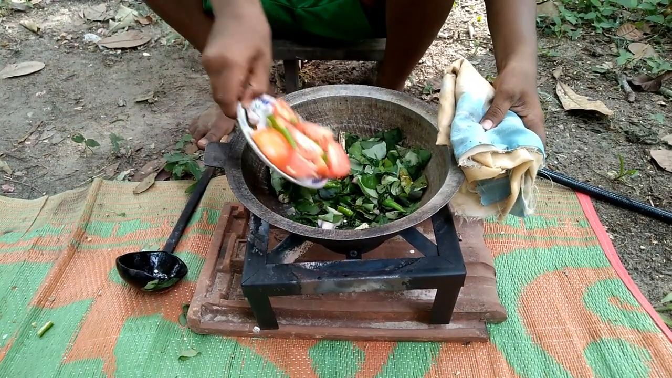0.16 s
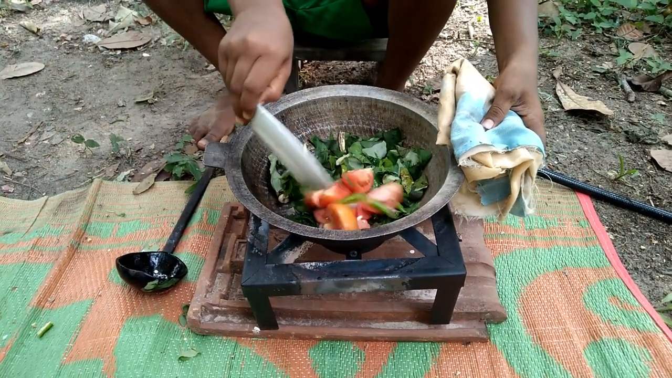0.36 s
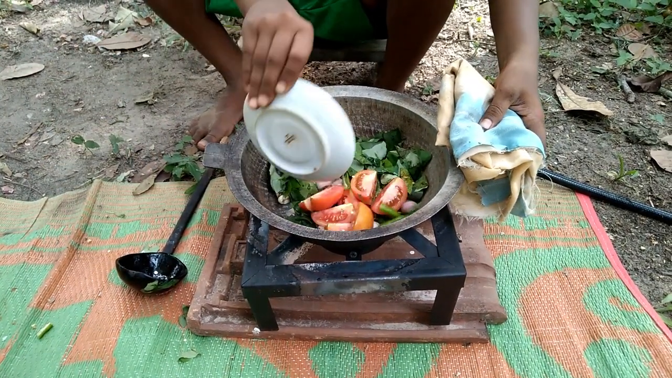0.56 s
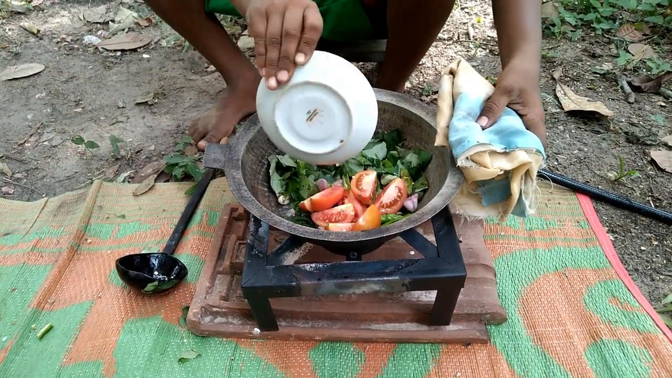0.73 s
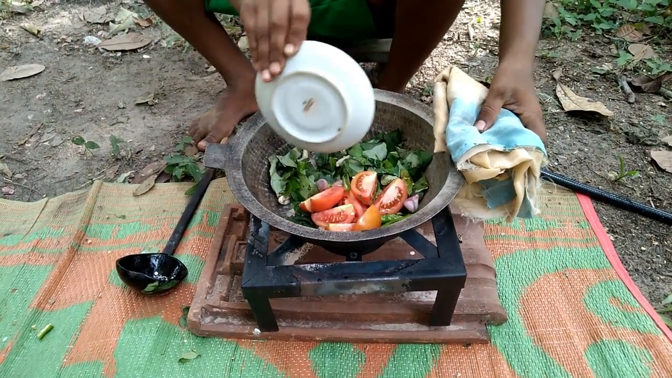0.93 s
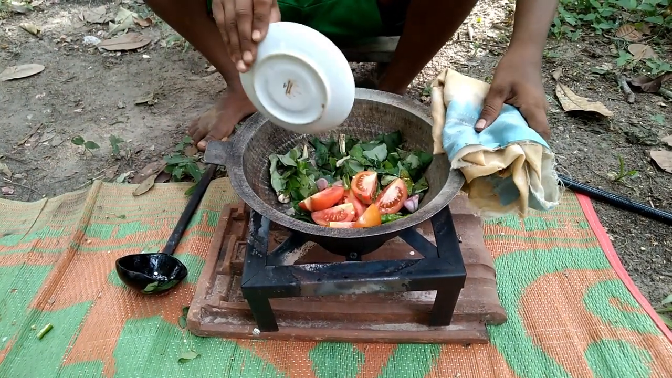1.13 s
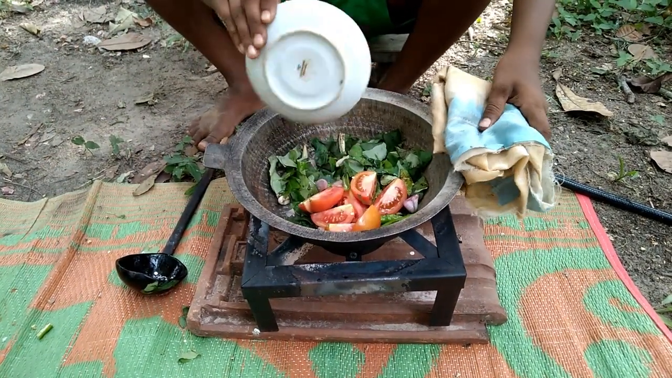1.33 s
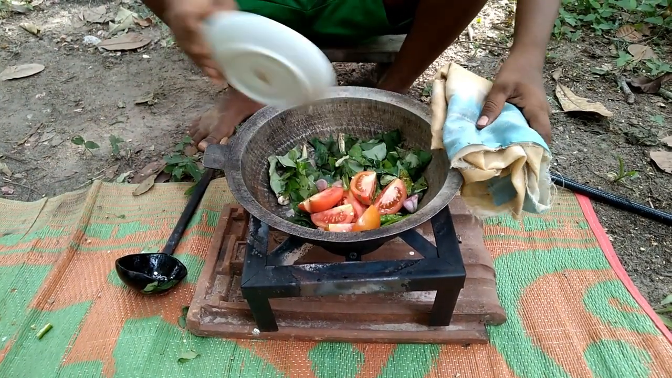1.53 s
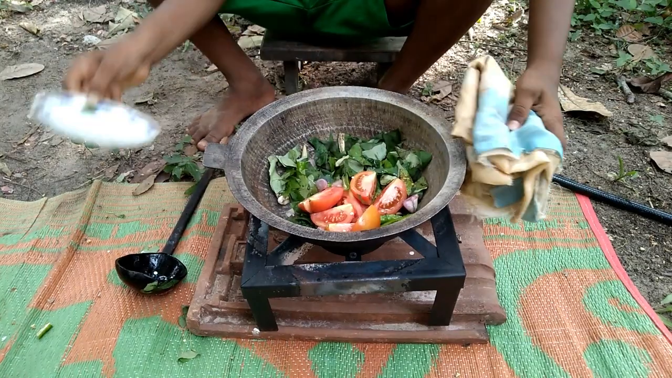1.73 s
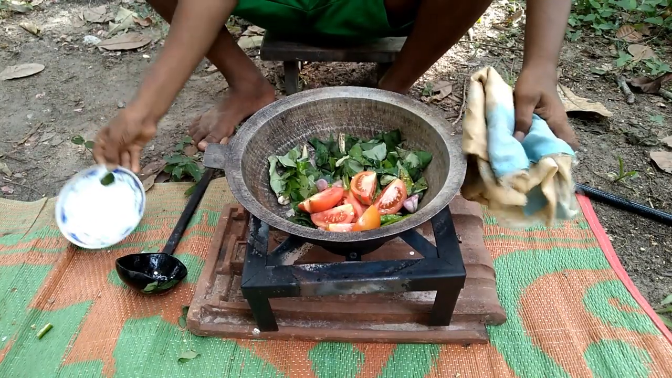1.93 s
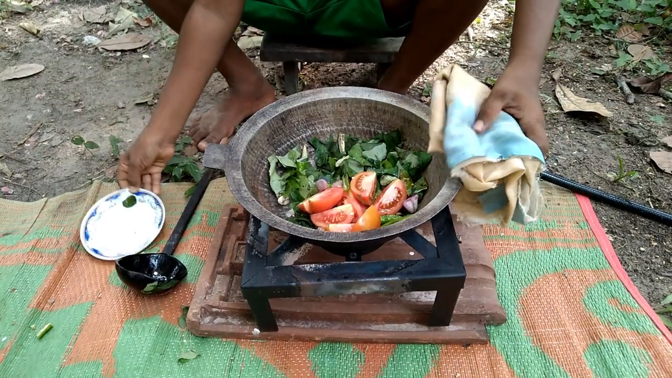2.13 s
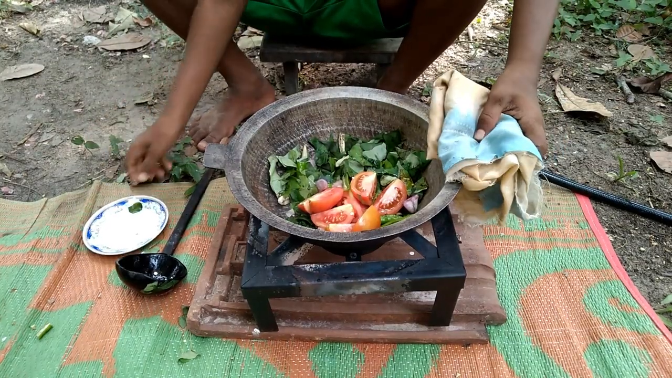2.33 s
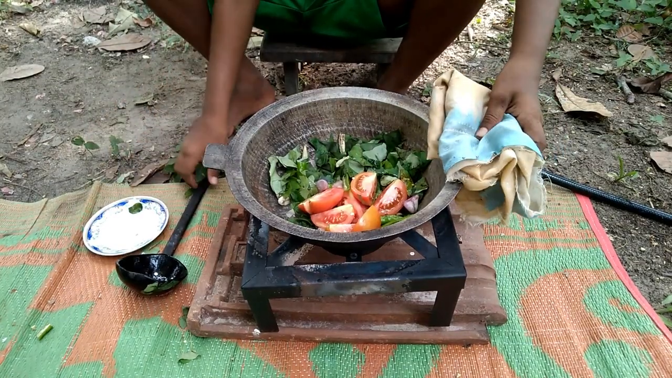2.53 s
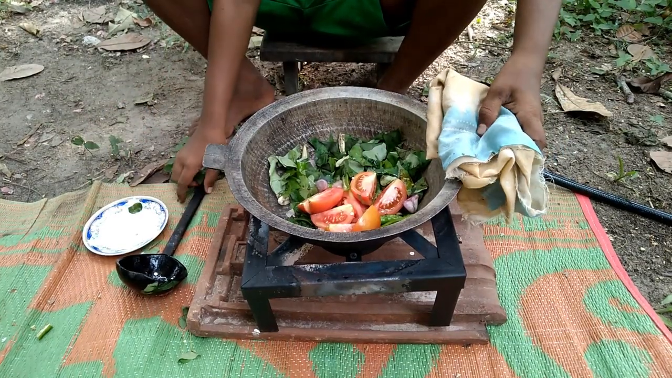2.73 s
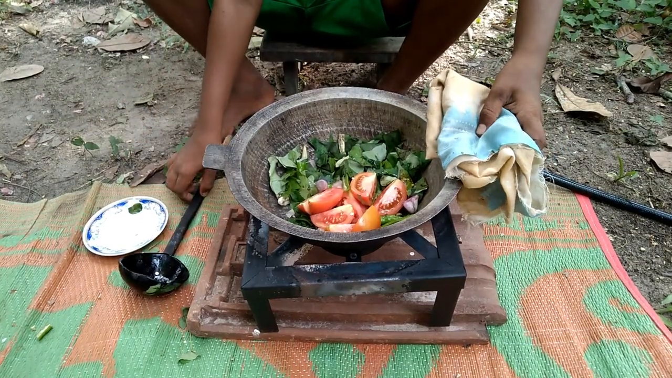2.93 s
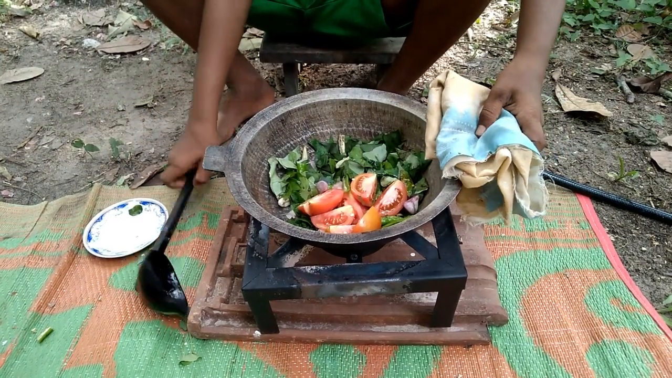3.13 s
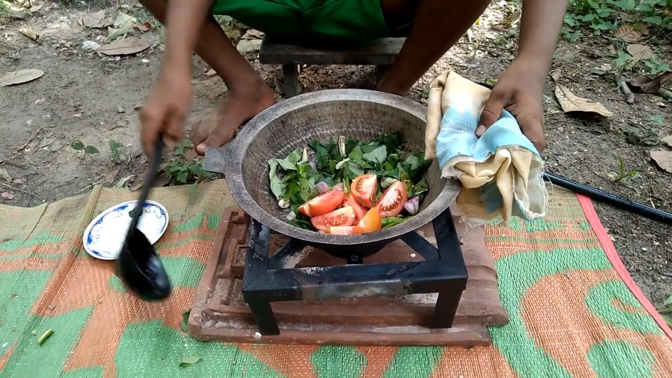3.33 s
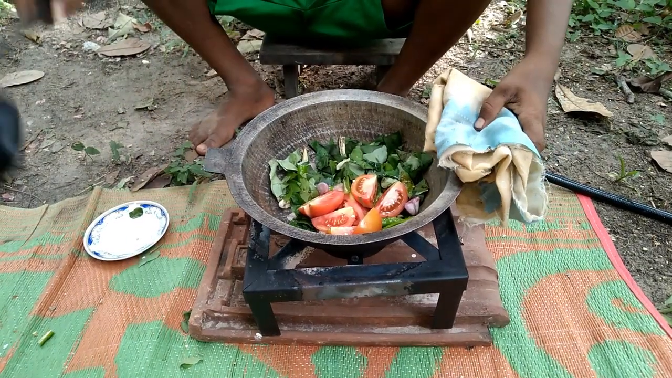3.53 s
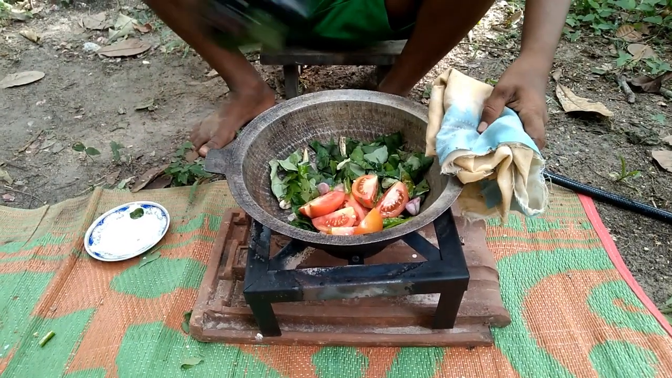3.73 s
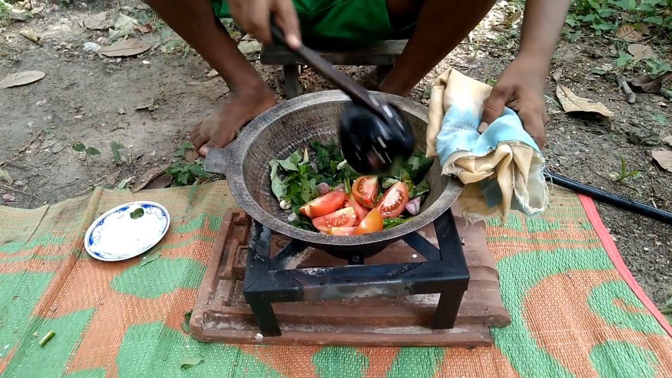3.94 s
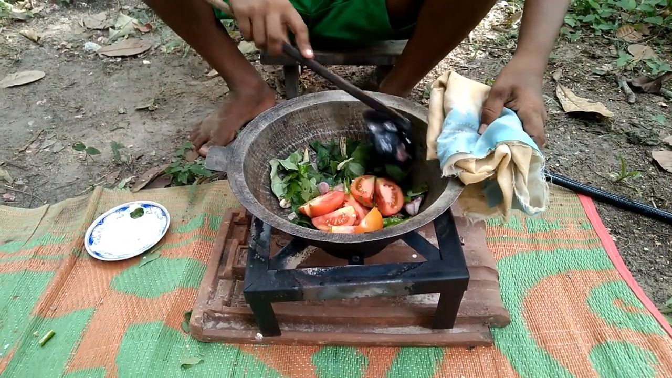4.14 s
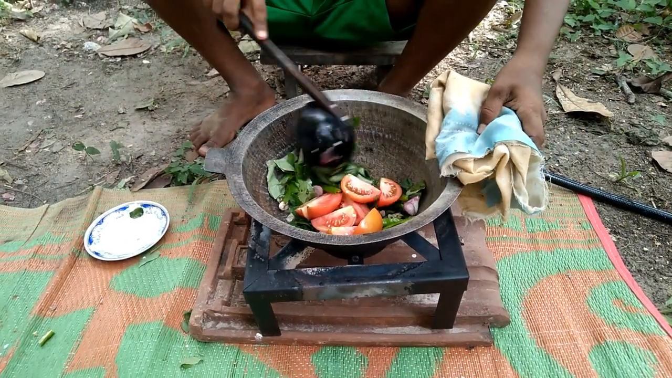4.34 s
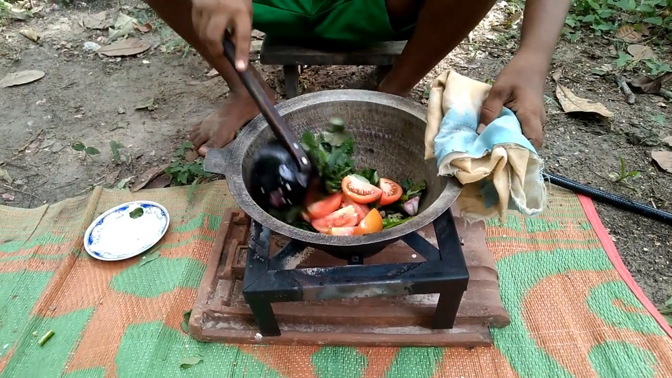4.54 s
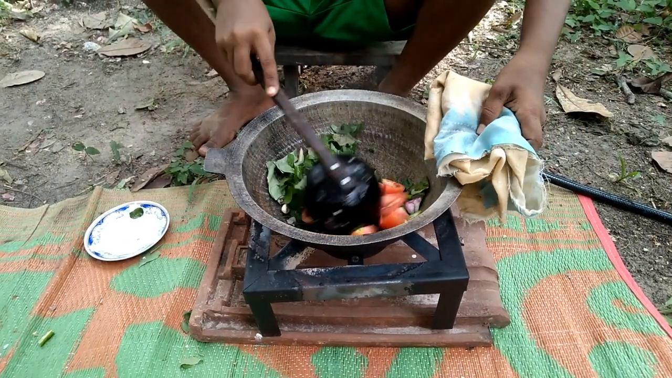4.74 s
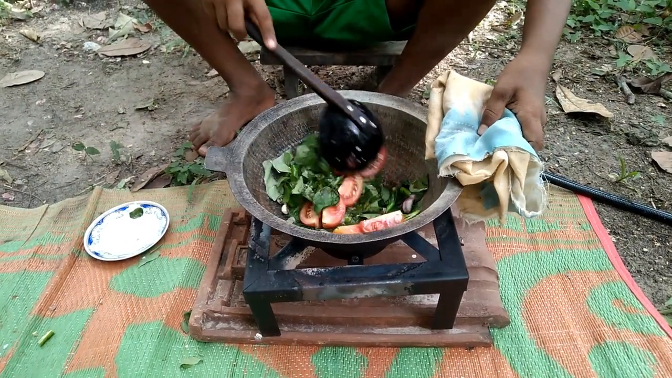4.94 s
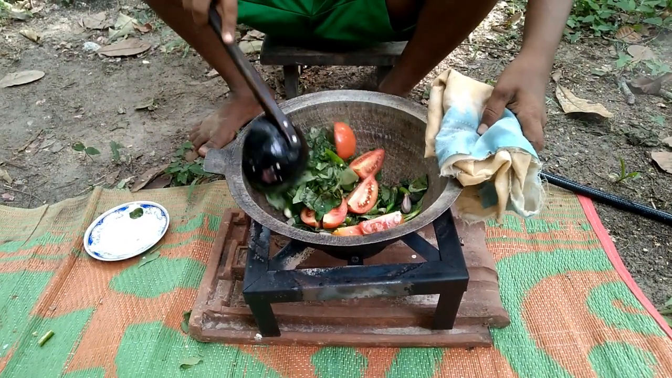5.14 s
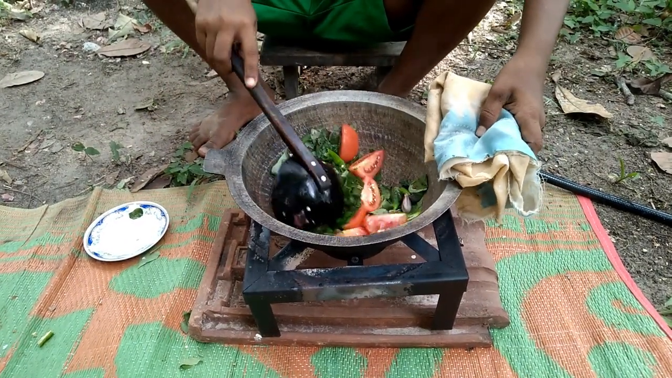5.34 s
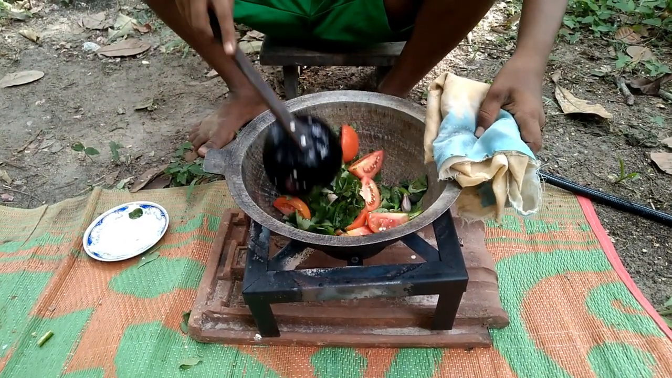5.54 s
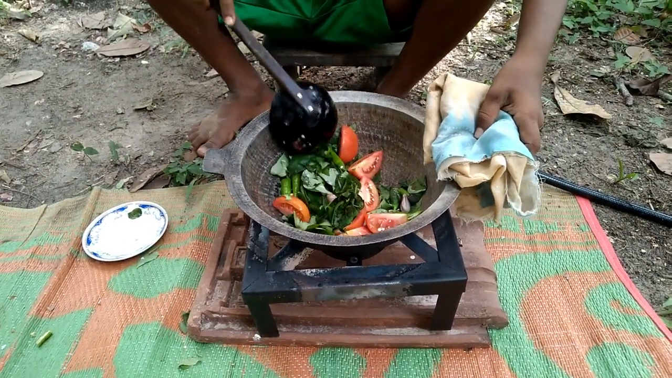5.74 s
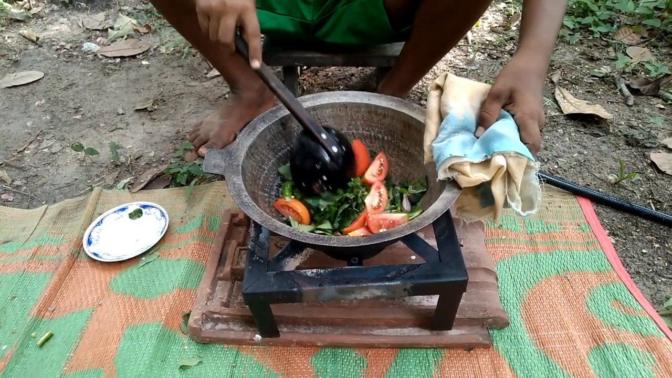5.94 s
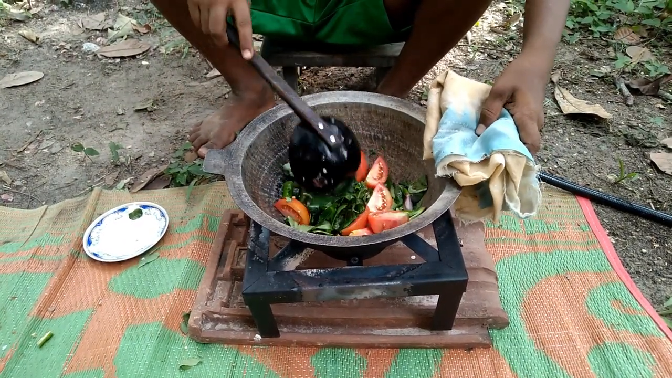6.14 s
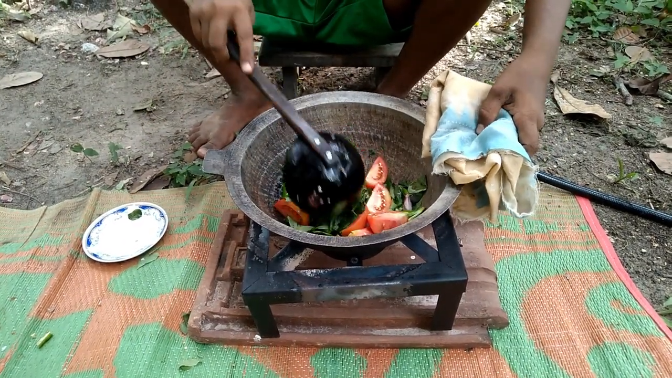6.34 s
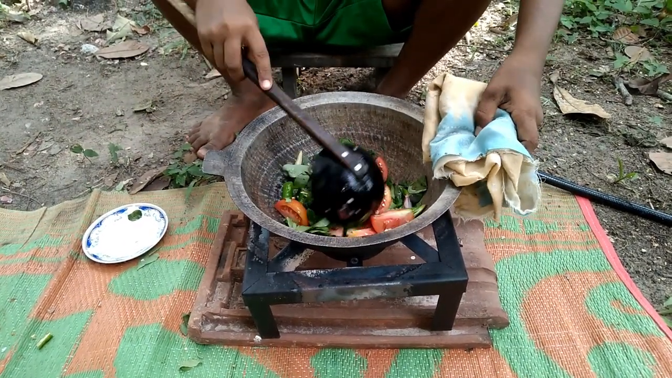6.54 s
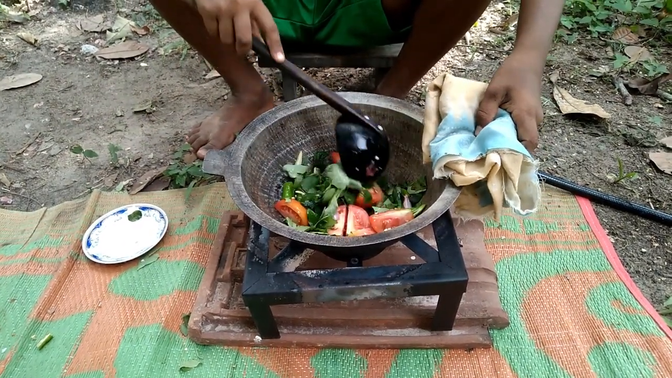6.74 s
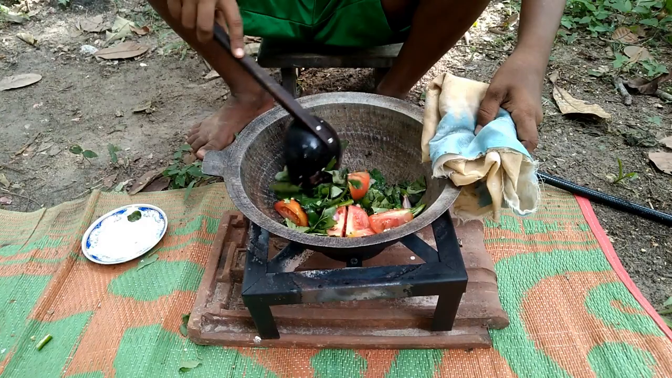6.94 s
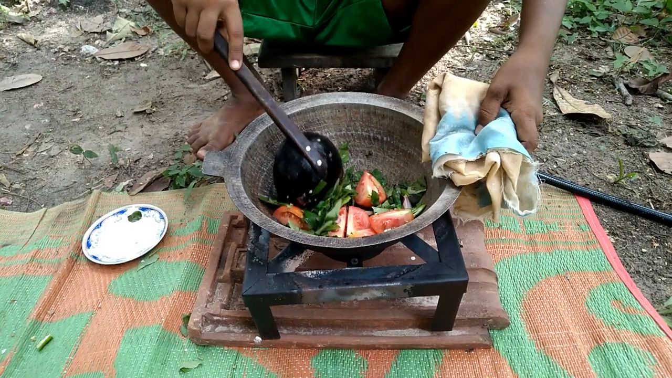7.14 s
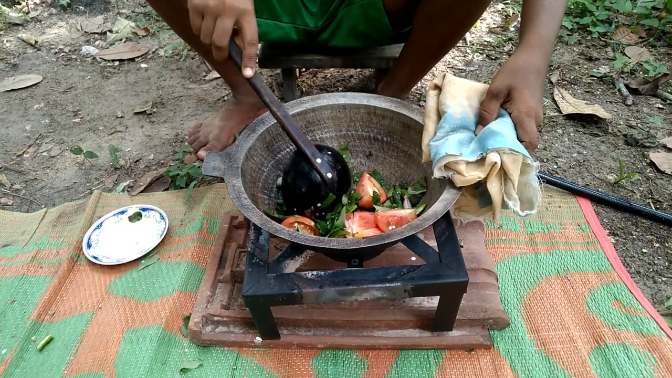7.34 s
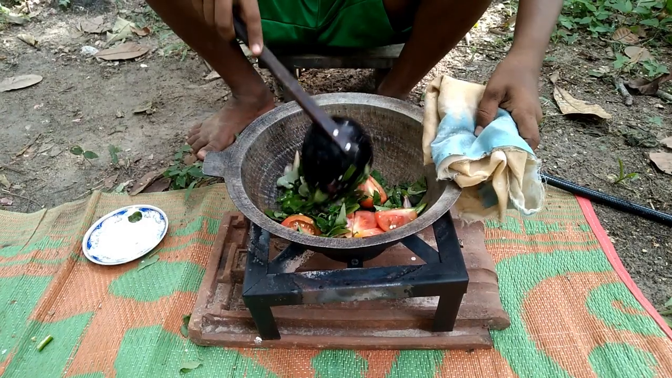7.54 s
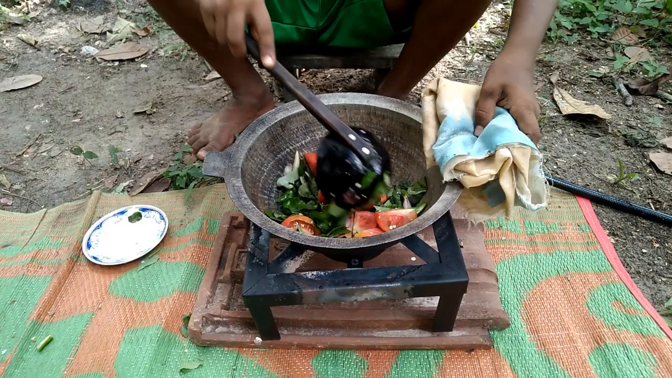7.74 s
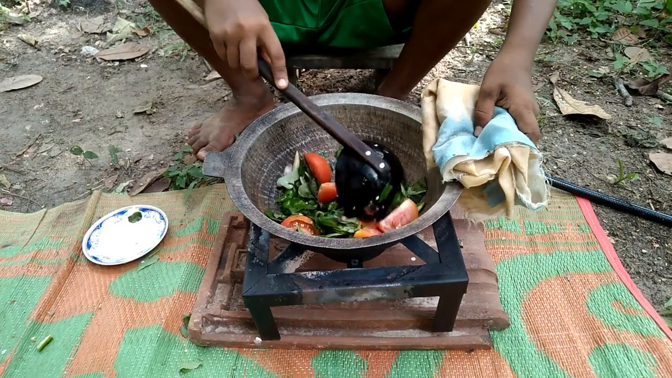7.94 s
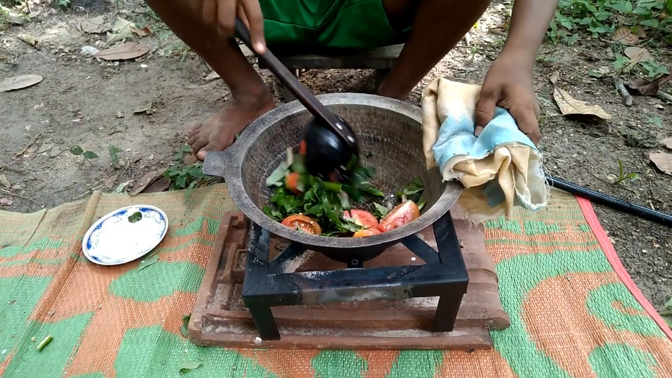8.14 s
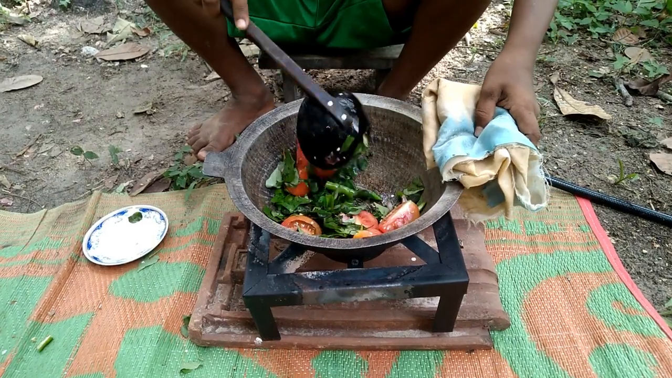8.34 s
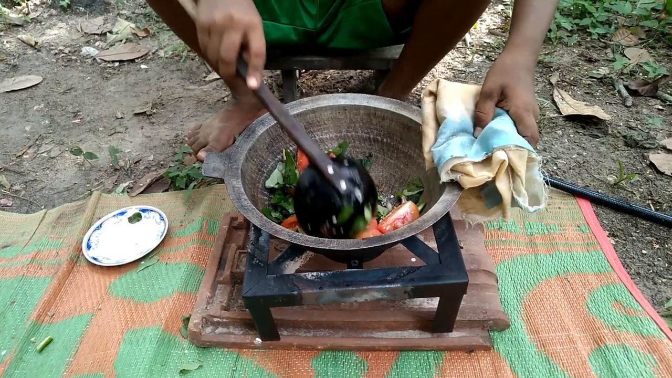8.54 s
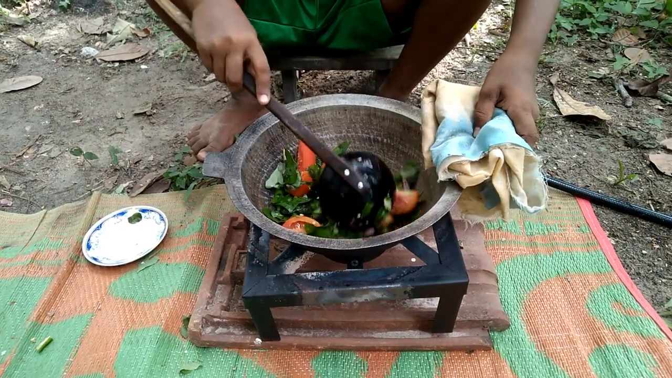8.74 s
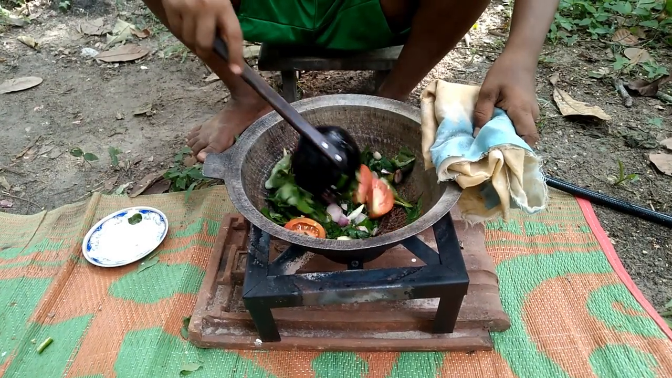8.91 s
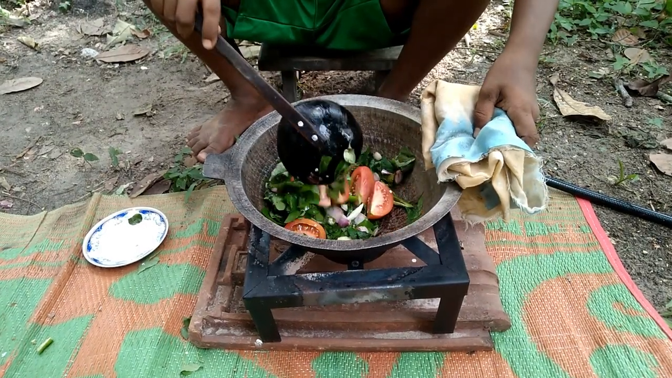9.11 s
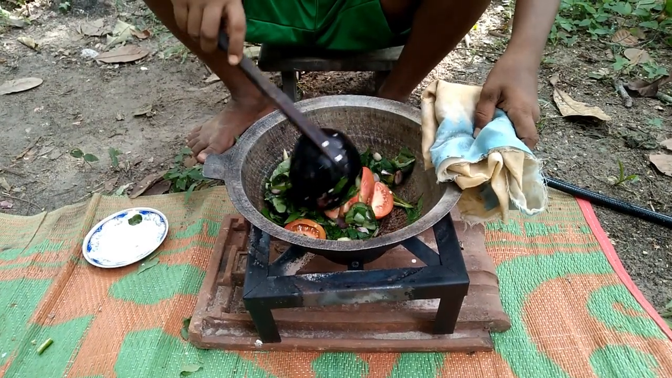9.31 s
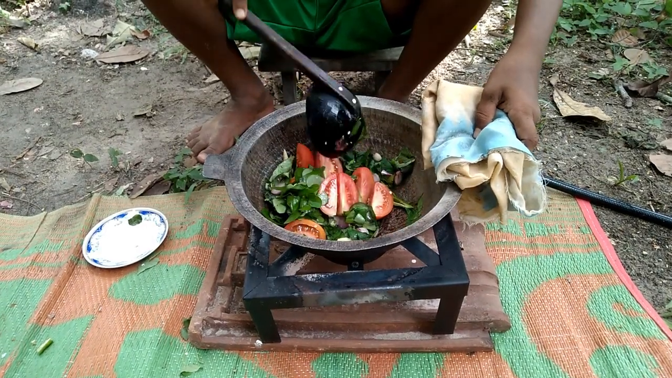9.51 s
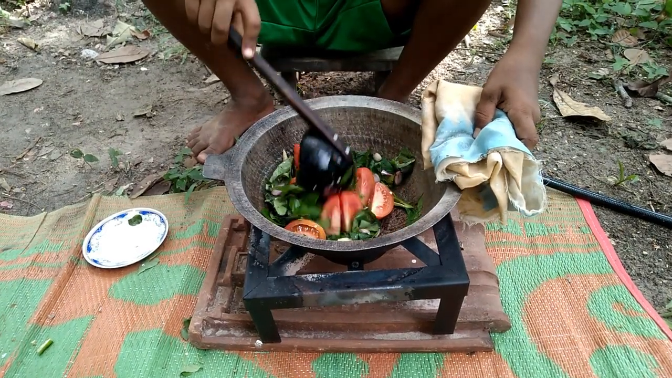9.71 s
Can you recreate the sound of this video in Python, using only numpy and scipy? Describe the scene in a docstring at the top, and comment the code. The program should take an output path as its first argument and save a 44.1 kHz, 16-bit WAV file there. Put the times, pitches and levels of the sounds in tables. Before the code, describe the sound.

Continuous bright cricket trilling dominates a quiet yard. Soft plate and food taps come first, with gliding bird whistles far behind. After about three seconds a utensil is picked up with a knock; then rustling greens and a few short, ringing ladle blows on a metal pan, each with a brief scrape. Later only softer bumps and leafy stirring remain. A small microphone nearby catches it all with short outdoor scattering.

```python
"""A dense chorus of crickets over a low rumble and open-air hiss comes first, joined at once by one near cricket.
Crickets are tooth-rate oscillators that fall in pitch; rumble, hiss and rustling greens are shaped noise.
A distant bird whistles in gliding near-pure tones; small things tap as damped resonances and tick as noise bursts.
Nearest, a ladle knocks and stirs greens in a metal pan on an outdoor stove: decaying modes, knock and scrape."""
import sys
import numpy as np
from scipy import signal
from scipy.io import wavfile
from scipy.ndimage import uniform_filter1d, map_coordinates

SR = 44100
rng = np.random.default_rng(int(sys.argv[2]) if len(sys.argv) > 2 else 0)


def inscribe(sig):
    """Save sig as 16-bit PCM at rate SR to the path in sys.argv[1].

    A 1-D sig is mono; a 2-D sig holds one channel per row.
    Samples are clipped to [-1, 1] before scaling.
    """
    pcm = np.round(np.clip(np.atleast_2d(sig).T, -1, 1) * 32767)
    wavfile.write(sys.argv[1], SR, pcm.astype(np.int16))


N = 435266  # length in samples


def amp(db):
    """Decibel law: twenty decibels are a factor of ten in amplitude."""
    return 10 ** (np.asarray(db) / 20)


def evened(x):
    """Normalisation to unit root-mean-square."""
    return x / np.sqrt(np.mean(x ** 2) + 1e-20)


def read(points, hz):
    """Interpolation of a spectrum along logarithmic frequency."""
    f, value = np.transpose(points)
    return np.interp(np.log(hz + 1), np.log(f + 1), value)


def level(table, axis):
    """Amplitude envelope: gain over time from one dB column of a curve."""
    table = np.array(table)
    return amp(np.interp(np.arange(N) / SR, table[:, 0], table[:, axis]))


def add(mix, s, sound):
    """Superposition of a sound on the mix from time s, cut at the end of the mix."""
    part = mix[round(s * SR):][:len(sound)]
    part += sound[:len(part)]


def ring(x, hz, width):
    """Single resonance: unit gain at its peak, half-power width in Hz, no response at zero frequency."""
    return signal.lfilter(*signal.iirpeak(hz, hz / width, SR), x)


def echoes(x, t60, db):
    """Diffuse scattering from ground and bushes: a short noise tail with exponential decay."""
    t = np.arange(SR // 4) / SR
    tail = rng.standard_normal(len(t)) * amp(-60 * t / t60) * (t > .002)
    return x + amp(db) * signal.oaconvolve(x, tail / np.linalg.norm(tail))[:N]


def noise(spectrum, patchy_db, patch_s, size=1024):
    """Spectrally shaped random noise of unit rms, its level drifting in patches of time and frequency."""
    hop, hz = size // 4, np.fft.rfftfreq(size, 1 / SR)
    frames = np.arange(N // hop + 5)
    grid = rng.standard_normal((400, 80))
    # patches are about 125 Hz wide in the bass and widen with frequency
    where = np.meshgrid(frames * hop / SR / patch_s, 12 * np.log(1 + hz / 1500), indexing="ij")
    patches_db = patchy_db * map_coordinates(grid, where, order=1, mode="wrap")
    z = rng.standard_normal((len(frames), len(hz), 2)) @ [1, 1j]
    z *= amp(read(spectrum, hz) + patches_db)
    return evened(signal.istft(z.T, nperseg=size, noverlap=size - hop)[1][:N])


# Spectrum of the rumble: (frequency [Hz], relative level [dB per Hz])
RUMBLE_SPECTRUM = [(15, -51.5), (25, -22), (37, -21.5), (59, -3.5), (103, 3), (184, -6), (233, -16),
                   (420, -17.5), (550, -43), (920, -120)]
RUMBLE_DB, RUMBLE_SWELL_DB, RUMBLE_SWELL_S = -80, 3.5, 0.099  # mean level, spread and spacing of the swells


def rumble():
    """Low-frequency random noise whose level swells by slow random modulation."""
    knots = np.arange(0, N / SR + 1, RUMBLE_SWELL_S)
    swell = np.interp(np.arange(N) / SR, knots, rng.standard_normal(200)[:len(knots)])
    return amp(RUMBLE_DB + RUMBLE_SWELL_DB * swell) * noise(RUMBLE_SPECTRUM, 1.8, 0.068, size=2048)


# Hiss levels before each band's fixed gain, the low and middle bands thinning out now and then:
# (time [s], low band [dB], middle band [dB], high band [dB])
HISS_LEVELS = [(0, -83, -100, -69.5), (.26, -96, -99, -71.5), (.42, -84, -83, -67.5),
               (1.0, -89.5, -81.5, -70), (1.5, -80, -80.5, -70.5), (2.0, -84, -81, -68.5),
               (2.4, -78, -79.5, -68), (2.9, -82, -81, -68), (4.4, -77, -79.5, -68), (4.84, -72, -80, -66),
               (5.1, -84, -86.5, -71.5), (5.45, -79.5, -91, -73), (5.76, -92, -102, -72),
               (5.9, -68.5, -74, -63.5), (6.15, -83, -87.5, -70), (6.6, -90, -99, -69.5),
               (6.78, -80, -83.5, -66), (7.05, -78.5, -87.5, -70), (7.5, -75.5, -80.5, -69.5),
               (7.85, -78.5, -88.5, -68.5), (8.15, -70, -78.5, -63.5), (8.45, -86, -92, -71),
               (8.95, -76.5, -84, -66), (9.57, -85.5, -92, -67.5), (9.87, -75, -84.5, -68)]
# Spectra of the three bands of hiss: (frequency [Hz], relative level [dB per Hz])
LOW_AIR_SPECTRUM = [(250, -42), (420, -18), (600, -2), (850, -4.5), (1150, -19), (2000, -80)]
MID_AIR_SPECTRUM = [(500, -52.5), (800, -8), (1100, -1), (2000, 0.5), (2450, -1.5), (2700, -27.5),
                    (4000, -73.5)]
HIGH_AIR_SPECTRUM = [(1500, -67), (2300, -8), (2800, -12), (3500, -6.5), (5500, -5), (8800, -28.5),
                     (10000, -44), (11300, -14), (13000, -36.5), (15500, -24)]


def open_air_hiss():
    """Broadband noise as a sum of three bands, patchiest in the lowest and smoothest in the highest."""
    low = amp(1.5) * level(HISS_LEVELS, axis=1) * noise(LOW_AIR_SPECTRUM, 6.0, 0.074)
    mid = amp(9.5) * level(HISS_LEVELS, axis=2) * noise(MID_AIR_SPECTRUM, 4.85, .06)
    high = amp(1.0) * level(HISS_LEVELS, axis=3) * noise(HIGH_AIR_SPECTRUM, 2.3, .08, size=512)
    return low + mid + high


# One wing stroke, before each singer's pitch factor: (time from its peak [ms], tooth rate [Hz], level [dB])
WING_STROKE = [(-5.5, 3900, -28.5), (-2, 3830, -13), (-1, 3720, 0.5), (2, 3560, -10.5), (5.5, 3420, -6),
               (6, 3242, -9.5), (7.5, 3130, -31)]
# Harmonics of the wing: (multiple of the tooth rate, level [dB])
WING_HARMONICS = [(1, -31.5), (2, -0.5), (3, -36), (4, -44.5)]


def stroke(pitch, start):
    """Stridulation: a falling tooth rate drives the wing, which favours its second multiple."""
    ms, hz, db = np.transpose(WING_STROKE)
    t = np.arange(ms[0], ms[-1], 1000 / SR)  # ms
    turns = np.cumsum(pitch * np.interp(t, ms, hz)) / SR + start
    shape = uniform_filter1d(amp(np.interp(t, ms, db)), size=30) * signal.windows.tukey(len(t), .15)
    out = np.zeros(len(t))
    for k, harmonic_db in WING_HARMONICS:
        out += amp(harmonic_db) * shape ** max(k / 2, 1) * np.sin(2 * np.pi * k * turns)
    return out


# Level of the chorus before its two parts are weighted: (time [s], level [dB])
CHORUS_LEVELS = [(0.0, -46), (0.66, -48.5), (2.6, -49), (4.6, -48.5), (5.2, -48.5), (6.95, -48),
                 (9.87, -48)]
# Spectrum of the far singers: (frequency [Hz], relative level [dB per Hz])
FAR_CHORUS_SPECTRUM = [(3240, -55), (5500, -38), (5850, -41.5), (6230, -13), (6600, -3.5), (7280, 2),
                       (7730, -2.5), (8480, -21.5), (8810, -48), (9200, -39.5), (12000, -57.5),
                       (20200, -120)]
CHORUS_PER_S = 900  # mean strokes per second


def chorus():
    """Incoherent summation of many singers: random separate strokes close by, a noise blur far away."""
    size = amp(3.8 * np.minimum(rng.exponential(1, N), 4)) * (rng.random(N) < CHORUS_PER_S / SR)
    singer = rng.integers(0, 8, N)  # each stroke takes one of eight pitches
    strokes = np.zeros(N)
    for k, pitch in enumerate(np.linspace(.975, 1.025, num=8)):
        strokes += signal.oaconvolve(size * (singer == k), stroke(pitch, 0))[:N]
    close = amp(-7.5) * evened(echoes(strokes, 0.027, -1.6))
    far = amp(-3) * noise(FAR_CHORUS_SPECTRUM, 0.84, .05, size=512)
    return level(CHORUS_LEVELS, axis=1) * (close + far)


def note(length, share, hz, db, flutter_db, flutter_s):
    """Frequency and amplitude modulation: a near-pure tone along an outline, fluttering in level."""
    u = np.arange(0, length, 1 / SR) / length
    grain = max(round(flutter_s * SR), 1)
    flutter = flutter_db * evened(uniform_filter1d(rng.standard_normal(SR // 2), grain))[:len(u)]
    tone = np.sqrt(2) * np.sin(2 * np.pi * np.cumsum(np.interp(u, share, hz)) / SR)
    return amp(np.interp(u, share, db) + flutter) * tone * signal.windows.tukey(len(u), .1)


# Levels of both kinds of call are before the common gain and the echoes.
# Bird whistles: (start [s], length [s], top pitch [Hz], level [dB])
WHISTLE_CALLS = [(.28, 0.41, 1585, -66.5), (1.548, 0.39, 1604, -65), (2.597, .4, 1632, -67.5),
                 (3.67, .38, 1643, -64.5)]
# Their outline, which dips, climbs to its top and drops away:
# (share of the length, pitch as a share of the top, level [dB])
WHISTLE_OUTLINE = [(0, .93, -3), (.1, 0.94, -4.5), (.29, 0.88, 0.5), (0.419, 0.97, -9), (.51, 0.96, 2),
                   (.62, 1, -9), (.71, 0.92, -0.5), (0.901, .79, -12.5), (1, .715, -4)]
# Short falling notes:
# (start [s], length [s], first pitch [Hz], last pitch [Hz], level [dB], flutter [dB], flutter grain [s])
FALLING_NOTES = [(.76, 0.11, 5050, 4570, -70, 6, .004), (0.935, .09, 6070, 5900, -70, 7, .003),
                 (1.18, .09, 5020, 4500, -68.5, 7, .004), (2.264, 0.11, 1000, 963, -76.5, 7, .014),
                 (8.61, 0.21, 1003, 950, -74.5, 4, 0.013)]
TWEET_PEAK, TWEET_START_DB, TWEET_END_DB = .25, -11, -15  # loudest at this share of the length


def birds():
    """Gliding tones, whistles of one shape and short falling notes, blurred by scattering over distance."""
    out, (share, pitch, shape_db) = np.zeros(N), np.transpose(WHISTLE_OUTLINE)
    for s, length, top_hz, db in WHISTLE_CALLS:
        add(out, s, note(length, share, top_hz * pitch, db + shape_db, 1.2, 0.01))
    outline_db = np.array([TWEET_START_DB, 0, TWEET_END_DB])
    for s, length, first_hz, last_hz, db, *flutter in FALLING_NOTES:
        hz = [first_hz, first_hz + TWEET_PEAK * (last_hz - first_hz), last_hz]
        add(out, s, note(length, [0, TWEET_PEAK, 1], hz, db + outline_db, *flutter))
    return amp(1.5) * echoes(out, 0.55, -1.3)


# Plate, handle and lumps of food landing, before echoes:
# (time [s], peak level [dB], main resonance [Hz], nominal ring length setting the bandwidth [s])
TAP_EVENTS = [(0.467, -62, 530, 0.08), (0.555, -55.5, 543, 0.05), (1.324, -50, 645, 0.081),
              (1.354, -51.5, 428, 0.14), (1.403, -60.5, 501, .05), (3.277, -40, 1090, 0.011),
              (3.284, -43.5, 400, 0.094), (3.335, -58, 405, 0.21), (3.956, -57.5, 940, 0.021),
              (4.139, -48, 186, .05), (4.169, -54.5, 495, 0.068), (6.708, -54.5, 710, 0.02),
              (6.939, -50, 800, 0.025), (6.949, -43.5, 690, 0.02), (7.261, -63.5, 627, 0.06),
              (7.328, -66, 727, 0.043), (7.395, -62, 660, 0.057), (8.092, -52, 400, 0.044),
              (8.764, -59.5, 600, 0.073)]
# Dry ticks of the mat and leaves: (time [s], approximate starting level [dB])
TICK_EVENTS = [(1.3304, -62), (2.2363, -69), (2.373, -62), (2.59, -92), (2.885, -70), (3.2779, -70),
               (3.8328, -67), (3.9581, -56), (4.139, -44), (5.1049, -51), (6.6563, -73.5), (8.8114, -62)]


def small_things():
    """Impact excitation: soft pushes ring a few loose overtones, and differenced noise bursts make dry ticks."""
    out, t = np.zeros(N), np.arange(6000) / SR
    overtones = [(.65, -13.5), (1, 5), (1.45, -4.5), (1.8, -9.5), (2.7, -6.5), (4.6, -23)]  # (multiple, dB)
    for s, db, hz, length in TAP_EVENTS:
        # averaging softens the contact and removes treble
        push = uniform_filter1d(rng.standard_normal(len(t)) * np.exp(-t / 0.0032), size=12)
        tap = sum(amp(g) * ring(push, hz * k, k * 4.1 / length) for k, g in overtones)
        add(out, s, amp(db) * tap / abs(tap).max())
    out = echoes(out, 0.11, -0.5)
    for s, db in TICK_EVENTS:
        decay = np.exp(-t / .0015) + .12 * np.exp(-t / .02)
        tick = np.diff(rng.standard_normal(len(t)) * decay, n=2)
        add(out, s, amp(db) * 0.42 * tick)  # 0.42 offsets the gain of differencing
    return out


PAIR_GAP_S = .0228  # between the two strokes of a chirp
WEAKER_DB = 1.94  # mean shortfall of a single stroke
# Count of chirps, about 12 a second and uneven near some blows: (peak of first stroke [s], chirp number)
CHIRP_COUNT = [(.0713, 0), (.3914, 4), (.7862, 9), (1.108, 13), (1.265, 15), (1.4246, 17), (1.6706, 20),
               (2.7946, 34), (3.906, 48), (4.389, 54), (4.547, 56), (4.676, 57), (4.774, 58), (5.185, 63),
               (5.2705, 64), (5.839, 71), (5.9336, 72), (6.017, 73), (6.577, 80), (7.553, 92), (8.208, 100),
               (8.7651, 107), (9.0074, 110), (9.4853, 116), (9.7995, 120)]
# Strongest strokes, before echoes: (time [s], first stroke level [dB], second stroke level [dB])
STRONGEST_STROKES = [(0, -34, -35), (1.9, -36, -34), (2.7, -32.5, -36), (3.8, -34, -31.5),
                     (4.8, -32, -37.5), (5.5, -34.5, -31.5), (6.2, -34.5, -37), (6.6, -33.5, -30.5),
                     (7.4, -31.5, -33.5), (7.9, -33.5, -35), (8.6, -32.5, -33), (9.87, -33, -33.5)]


def near_cricket():
    """Paired stridulation: two strokes a chirp, each slightly off in pitch, some weaker than the rest."""
    at, number = np.transpose(CHIRP_COUNT)
    times = np.interp(np.arange(number[-1] + 1), number, at)
    out = np.zeros(N)
    chance = rng.standard_normal((len(times), 4))
    shortfall = WEAKER_DB * rng.exponential(1, (len(times), 2))
    when, first_db, second_db = np.transpose(STRONGEST_STROKES)
    for s, (pitch_1, phase_1, pitch_2, phase_2), (loss_1, loss_2) in zip(times, chance, shortfall):
        start = s + WING_STROKE[0][0] / 1000
        first = stroke(1 + 0.0047 * pitch_1, phase_1)
        second = stroke(1 + 0.0085 * pitch_2, phase_2)
        add(out, start, amp(np.interp(s, when, first_db) - loss_1) * first)
        add(out, start + PAIR_GAP_S, amp(np.interp(s, when, second_db) - loss_2) * second)
    return echoes(out, 0.031, -9)


# Spectrum of the rustle: (frequency [Hz], relative level [dB per Hz])
RUSTLE_SPECTRUM = [(200, -21), (600, -22.5), (1500, -6.5), (4000, -4), (8500, 6.5), (11000, -7),
                   (15500, -9.5)]
# Greens and hands rustling: (start [s], rise [s], hold [s], level before the common gain [dB])
RUSTLE_EVENTS = [(.9, .07, 0.011, -99), (2.14, .02, .01, -94), (2.33, .02, .02, -92),
                 (2.571, 0.012, .01, -84), (3.184, 0.023, 0.076, -90), (3.82, .02, .14, -84),
                 (4.128, 0.0082, 0.14, -68), (4.592, 0.0087, 0.075, -65), (4.8, 0.16, .02, -65),
                 (5.06, 0.035, 0.096, -79.5), (5.206, .01, 0.31, -71), (5.496, 0.046, 0.35, -74),
                 (5.82, .01, 0.22, -72), (6.62, 0.025, .14, -78), (6.83, 0.0086, 0.11, -67.5),
                 (7.1, .1, 0.71, -89), (8.03, 0.037, 0.19, -77), (8.744, .12, 0.36, -71),
                 (9.2, 0.035, 0.79, -74)]
RUSTLE_FADE_DB_PER_S, RUSTLE_REST_DB = 130, -99  # the rest level is before the common gain too


def rustling():
    """Enveloped friction noise: each rustle swells, holds and fades at one rate above a faint rest level."""
    t, gain = np.arange(N) / SR, amp(RUSTLE_REST_DB)
    for s, rise, hold, db in RUSTLE_EVENTS:
        swell = np.clip((t - s) / rise, 0, 1) ** 2
        fade_db = RUSTLE_FADE_DB_PER_S * np.maximum(t - s - rise - hold, 0)
        gain = np.maximum(gain, swell * amp(db - fade_db))
    return amp(11.5) * gain * noise(RUSTLE_SPECTRUM, 2.5, .03, size=256)


# Modes of the pan, many in split pairs: frequency [Hz]
MODE_HZ = [395, 946, 1011, 1821, 1858, 2462, 1868, 2849, 2934, 3262, 3412, 3479, 3553, 3777, 3994, 4105,
           4219, 4500, 4825, 5109, 5655, 6400, 9300, 10150]
# One row a mode: (t60 before the blow's length factor [s], then level when struck at the
# near wall [dB], rim [dB], far wall [dB], floor [dB])
PAN_MODES = [(0.36, -47, -69, -74, -55), (0.46, -38, -45, -34.5, -57), (0.23, -36, -29.5, -60.5, -63),
             (0.35, -30, -29.5, -38, -66), (0.2, -24, -61, -29, -53), (1.1, -82, -46, -69, -78),
             (0.46, -66, -37.5, -67, -65), (0.2, -32.5, -23.5, -45, -55), (0.21, -64, -28, -56.5, -72),
             (0.33, -62.5, -58, -40, -85), (0.44, -65, -53, -40.5, -66), (.22, -63, -38.5, -61.5, -76),
             (0.39, -65, -42, -39.5, -81), (.2, -54, -47, -51.5, -77), (.23, -45, -43, -69, -80),
             (0.11, -63, -27, -54.5, -68), (0.29, -60, -37.5, -43, -68), (.17, -62.5, -49, -59.5, -59),
             (0.18, -28.5, -57, -70, -76), (0.15, -61.5, -41, -65, -76), (0.075, -59, -29.5, -65.5, -76),
             (0.15, -30.5, -63, -63, -74), (.12, -59, -76.5, -70.5, -66), (.15, -54, -84, -79.5, -73)]
# Neighbouring modes start in step (1) or opposed (-1), one entry a place
MODE_SIGN = [1, 1, -1, 1]
# Knock of the ladle itself, one list a place: (frequency [Hz], width [Hz], relative level [dB])
LADLE_KNOCK = [
    [(930, 460, -3), (1750, 210, -7), (2860, 110, -12), (4200, 210, 0), (4930, 270, 0), (7140, 1500, 9.5),
     (9200, 600, -6), (12500, 3000, -21.5)],
    [(400, 540, -25), (1120, 250, -9.5), (2940, 150, -7.5), (3940, 530, -2), (4780, 340, -7),
     (5800, 210, -9), (7450, 480, -29)],
    [(600, 120, -31.5), (1270, 200, 7), (1970, 480, -2), (3100, 470, -2), (4090, 110, -11.5),
     (5910, 300, -21), (6770, 320, -29.5)],
    [(298, 200, -12.5), (780, 360, -4.5), (1520, 60, -11), (3140, 320, -17), (6380, 300, -3.5),
     (8040, 840, 1), (8440, 690, -9), (11700, 6600, -2)],
]


def blow(place, ring_db, lasting, knock_db, scrape_db, scrape_t60):
    """Modal synthesis of an impact: the pan's modes decay, the ladle knocks, then skids over the metal."""
    t = np.arange(SR) / SR
    modes = np.zeros(len(t))
    for k, (t60, *struck_db) in enumerate(PAN_MODES):
        decay = amp(struck_db[place] - 60 * t / (t60 * lasting))
        modes += MODE_SIGN[place] ** k * decay * np.sin(2 * np.pi * MODE_HZ[k] * t)
    rising = 1 - np.exp(-t / 0.00031)  # the blow takes a moment to spread through the metal
    contact = rng.standard_normal(len(t)) * np.exp(-t / 0.0036) * np.minimum(t / 0.00017, 1)
    slips_db = 2.5 * evened(uniform_filter1d(rng.standard_normal(len(t)), size=150))  # the skid grips and slips
    skid = uniform_filter1d(rng.standard_normal(len(t)), size=3)  # duller than the knock
    knock, scrape = np.zeros(len(t)), np.zeros(len(t))
    for hz, width, db in LADLE_KNOCK[place]:
        gain = amp(db) / width ** .5
        knock += gain * ring(contact, hz, width)
        scrape += gain * ring(skid, hz, min(1.35 * width, hz))
    scrape_gain = amp(scrape_db + slips_db - 60 * t / scrape_t60)
    return amp(ring_db) * modes * rising + amp(knock_db) * knock / abs(knock).max() + scrape_gain * evened(scrape)


# Blows, levels before the band-pass and echoes:
# (time [s], place 0 near wall, 1 rim, 2 far wall, 3 floor, ring level [dB], ring length [factor],
# knock peak level [dB], scrape starting level [dB], scrape t60 [s])
LADLE_BLOWS = [(4.594, 0, -4, 0.8, -10, -37, 0.25), (4.6020, 0, -13.5, 0.95, -16, -48, .1),
               (5.2060, 1, -.5, 1.025, -13.5, -39, 0.38), (5.2351, 2, -7, 0.69, -23.5, -43, 0.17),
               (5.259, 3, -6, 1.03, -32, -50.5, 0.31), (5.8172, 2, 1, 0.98, -13, -39.5, .15),
               (6.8269, 3, 1, 1.2, -16, -47, 0.58), (6.949, 2, -30, 1.1, -47, -56, 0.04)]


def ladle():
    """Band-limited radiation: a rounded ladle gives little extreme treble, a small pan little bass."""
    out = np.zeros(N)
    for s, *how in LADLE_BLOWS:
        add(out, s, blow(*how))
    band = signal.butter(2, [190, 8500], "bandpass", fs=SR, output="sos")
    return echoes(signal.sosfilt(band, out), 0.046, -19)


def scene():
    """Linear superposition of all sources at one small microphone."""
    surroundings = rumble() + open_air_hiss() + chorus() + birds()
    nearby = small_things() + near_cricket() + rustling() + ladle()
    return (surroundings + nearby)[None]


EDGE_HZ = 15750  # upper band edge


def record(dry):
    """Band limitation of the recorder: a linear-phase low-pass filter."""
    lowpass = signal.firwin(511, EDGE_HZ, window=("kaiser", 9), fs=SR)
    return signal.oaconvolve(dry, lowpass[None], "same")


dry = scene()
out = record(dry)
inscribe(out)
```